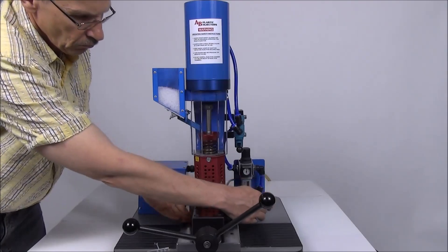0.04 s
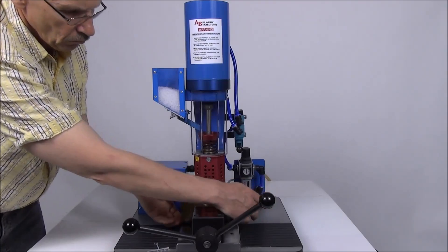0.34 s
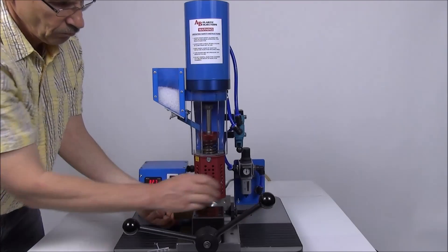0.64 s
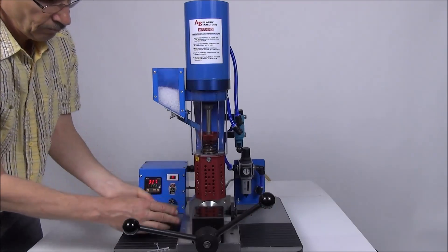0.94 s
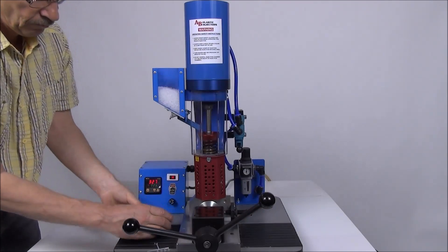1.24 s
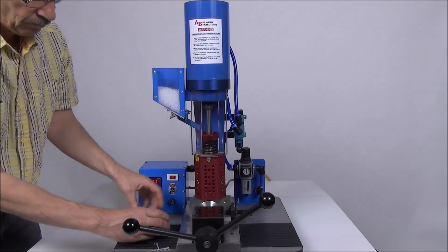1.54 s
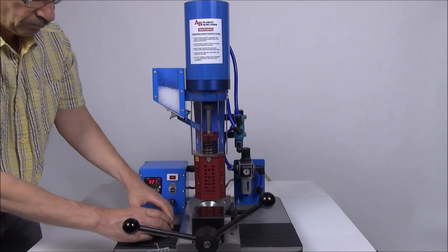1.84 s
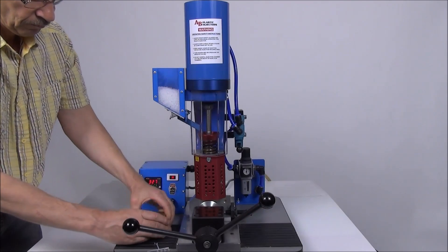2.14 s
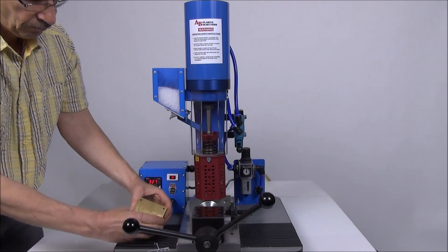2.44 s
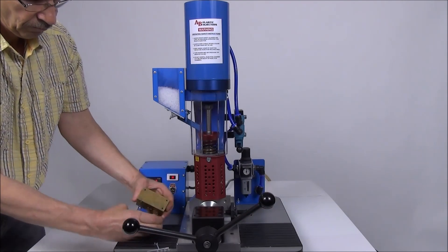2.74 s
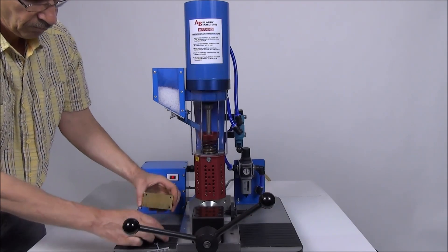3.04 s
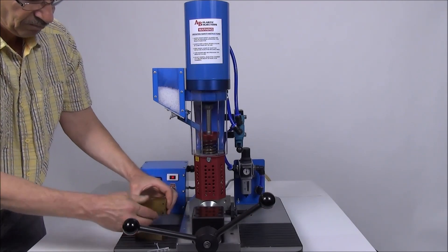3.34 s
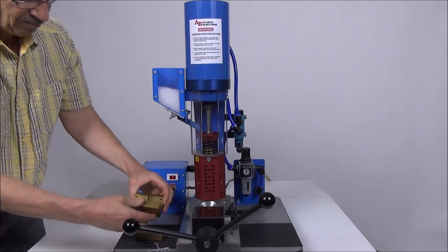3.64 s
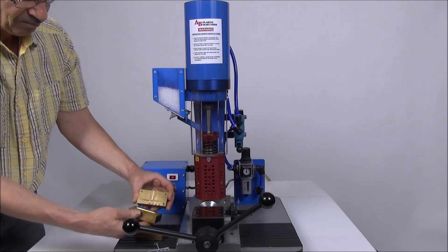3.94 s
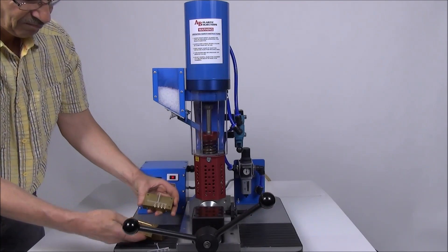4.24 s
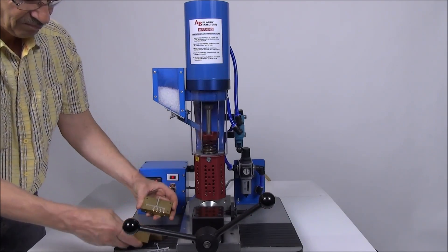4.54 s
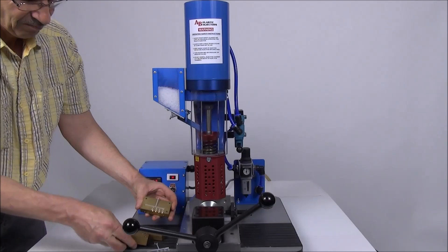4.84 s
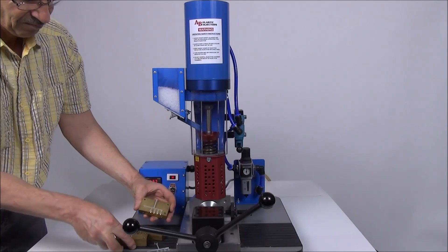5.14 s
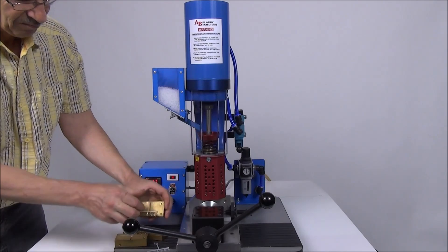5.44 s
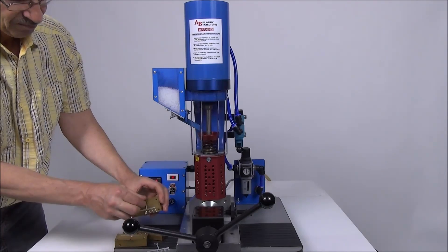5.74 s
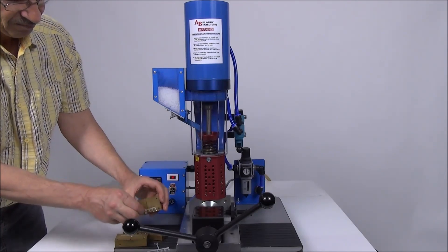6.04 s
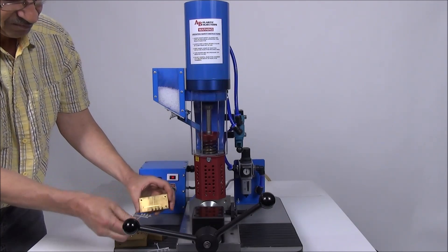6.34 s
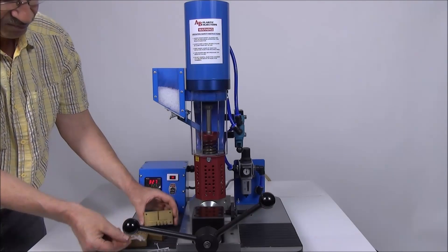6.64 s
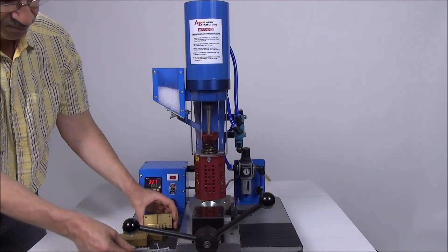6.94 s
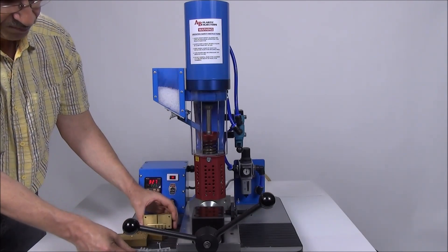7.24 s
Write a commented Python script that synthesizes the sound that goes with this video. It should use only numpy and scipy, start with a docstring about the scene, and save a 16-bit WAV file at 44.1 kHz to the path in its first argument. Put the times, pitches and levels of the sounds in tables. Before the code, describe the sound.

A brass mold clinks and knocks against a metal press base as its halves are parted and set down, over fan-like noise.

```python
"""Over a fan-like room noise and a thin whine, a brass mold scrapes softly and clinks. Its two halves are
pulled from a small bench press, parted and set down on the press's metal base. Light touches tick and
clink; heavy knocks thud through the bench and leave the press frame humming, and a loosely held half
sings when struck. The bright metal sounds echo briefly in a small workshop. An automatic gain control
turns everything down at a loud knock, then slowly back up."""
import sys
import numpy as np
from scipy import signal
from scipy.io import wavfile
from scipy.ndimage import uniform_filter1d

SR = 44100
rng = np.random.default_rng(int(sys.argv[2]) if len(sys.argv) > 2 else 0)


def store_pcm(level_fs):
    """Save levels as 16-bit WAV."""
    pcm = np.round(np.clip(level_fs, -1, 1) * 32767).astype(np.int16)
    wavfile.write(sys.argv[1], SR, np.atleast_2d(pcm).T)


N = 321749

# Levels in the tables are relative. A ring time (t60) is how long a sound takes to fall by 60 dB.
# The fan-like noise. Each row: frequency in Hz, level in dB.
FAN_SPECTRUM = [(22, -19.5), (65, -4), (95, -6.5), (150, -0.5), (250, -2), (420, -6), (750, -2),
                (1200, -7.5), (1850, -7.5), (3200, -17.5), (6500, -24.5), (11500, -22.5), (16000, -33)]
# Pitches that stand out of that noise. Each row: pitch in Hz, width in Hz, level in dB.
FAN_TONES = [(130, 14.4, -52), (697, 28, -65), (949, 13, -56.5), (1013.4, 19, -55), (1346, 35, -53.5),
             (1765, 14, -61.5)]
# How wide that noise sounds. Each row: frequency in Hz, side level compared with mid in dB.
FAN_WIDTH = [(30, -2), (130, -9), (500, -4.5), (1200, -8.5), (2400, 0), (8000, 0.5), (15000, -6)]
# A thin electronic whine. Each row: pitch in Hz, level in dB.
WHINE_TONES = [(12592, -79), (12807, -76), (12990, -68.5), (13178, -76), (13394, -69.5), (13722, -77)]
# The mold slides over the base. Each row: start in seconds, length in seconds, level in dB.
MOLD_SLIDES = [(0.0, 0.09, -51), (0.418, .12, -57), (0.812, 0.42, -49.5), (1.2, 0.23, -54)]
# Fingers shift the parts so they touch lightly. Each row: start in seconds, level in dB, pitch in Hz.
LIGHT_TOUCHES = [(0.026, -40, 4500), (0.066, -37, 4400), (0.626, -38, 4460), (1.658, -34, 5175),
                 (3.648, -26.5, 7300), (3.940, -29.5, 6540), (6.171, -38.5, 6000), (6.203, -39.5, 6000),
                 (7.018, -36, 5530)]
# A mold half meets the base or the other half: the bench thuds and clacks, the metal clinks.
# Each row: start in seconds, thud level in dB, thud's low edge in Hz, clack level in dB, clack pitch in Hz,
# clink level in dB, clink pitch in Hz, damping by the hand (width divided by pitch), edge ring level in dB.
MOLD_KNOCKS = [(0.050, -31, 302, -25.5, 1600, -25.5, 1730, 0.27, -47),
               (0.402, -40, 300, -27, 1920, -19, 4470, 0.14, -43),
               (0.712, -18, 320, -13.5, 1150, -9, 1450, 0.29, -36),
               (0.807, -16.5, 130, -8, 1480, 1, 4050, 0.099, 2),
               (0.871, -38, 190, -6, 1460, -14, 4270, 0.1, -24),
               (1.174, -20, 219, -27, 1150, -6, 3080, 0.12, -12),
               (1.416, 2, 360, -8, 720, -1.5, 3300, 0.36, -5.5),
               (1.428, -4, 128, -0.5, 900, 5.5, 3650, 0.54, 3),
               (1.441, -0.5, 90, -13, 1080, -9, 3900, 0.58, -8),
               (2.611, -40, 300, -29, 1600, -23, 2880, .48, -34),
               (2.979, 8, 290, 2, 1120, -4.5, 2260, 0.37, -14),
               (3.088, 5.5, 194, 11, 1200, 3.5, 2270, 0.3, -13),
               (3.124, 3.5, 197, 11.5, 1050, -3, 2200, 0.22, -21),
               (5.096, 7, 145, 9.5, 766, -5, 2290, 0.29, -25)]
# Short rings of the bench and base. Each row: pitch in Hz, level in dB, ring time in seconds.
BENCH_MODES = [(140.2, -19, 0.35), (167.3, -26, 0.12), (199, -34, 0.35), (238.2, -23.5, 0.36),
               (260.4, -27.5, 0.34), (311, -26, 0.16), (394, -22, 0.42), (427, -14, 0.29), (478, -24, 0.21),
               (501, -20.5, 0.1), (713, -23, 0.28), (767, -28, 0.32), (801, -24, 0.27), (840, -33, 0.26),
               (931, -26.5, 0.29), (993, -17.5, 0.18), (1022, -24.5, 0.23), (1153, -23, 0.16),
               (1158, -16, 0.14), (1375, -26.5, 0.33), (1538, -26, 0.28), (1695, -21.5, 0.26)]
# The bench's many other rings, which blur together. Each row: frequency in Hz, ring time in seconds.
BENCH_RING_TIMES = [(100, 0.51), (260, 0.54), (700, 0.34), (1100, 0.32), (1800, 0.31), (5000, 0.27)]
# How strong that blur is. Each row: frequency in Hz, level in dB.
BENCH_SPECTRUM = [(70, -6), (150, -2), (300, 0), (460, 2), (590, 0.5), (800, 2), (1100, -1), (1600, -0.5),
                  (2300, 2.5), (4000, 1.5)]
# Short, bright rings of the mold's edges. Each row: pitch in Hz, width in Hz, level in dB.
EDGE_MODES = [(7000, 430, 0), (9270, 460, -2)]
# For each edge ring, the dB it gains per dB of a knock's edge level: hard knocks favour the higher one.
EDGE_GAIN_SLOPES = (1, 1.15)
# The workshop's echo. Each row: frequency in Hz, ring time in seconds.
ROOM_RING_TIMES = [(200, 0.21), (1500, 0.35), (4500, 0.28), (10000, 0.26), (15000, 0.066)]
# The hum of the press frame. Each row: pitch in Hz, level in dB, ring time in seconds.
FRAME_MODES = [(195.7, -0.5, 2.38), (250, -12.5, 2.4), (348, -4.5, 1.76), (431, -2.5, 2), (440.5, 0, 1.2),
               (568, -8.5, 1.06), (682, -8.5, 1.47), (782, -10.5, 1.1), (1100, -14, 1.32)]
# Knocks that reach the frame. Each row: start in seconds, level in dB, treble tilt in dB per octave.
FRAME_KNOCKS = [(1.430, -27, -5), (3.090, -27, 3.5), (5.098, -24.5, -3.5)]
# A loosely held brass half is struck. Each row: start in seconds, level in dB.
BRASS_STRIKES = [(2.610, -37.5), (2.978, -43), (3.088, -24)]
# The notes it sings. Each row: pitch in Hz, level in dB, ring time in seconds.
BRASS_MODES = [(6640, 0, 0.12), (8600, -2.5, 0.17)]


def from_db(db):
    """Turn decibels into a number to multiply by."""
    return 10 ** (np.asarray(db) / 20)


def rms_one(x):
    """Scale a sound so its average strength (rms) is 1."""
    return x / np.sqrt(np.mean(x ** 2) + 1e-20)


def at_hz(points, hz):
    """Read between the rows of a (Hz, value) table, with octaves evenly spaced."""
    freqs, values = np.array(points).T
    return np.interp(np.log(hz), np.log(freqs), values)


def band(x, low_hz, high_hz, order=2):
    """Keep what lies between two frequencies."""
    edges = [low_hz, np.clip(high_hz, low_hz * 1.1, SR * .48)]
    return signal.sosfilt(signal.butter(order, edges, "band", fs=SR, output="sos"), x)


def around(x, hz, octaves):
    """Keep a band so many octaves wide around a pitch."""
    half = 2 ** (octaves / 2)
    return band(x, hz / half, hz * half)


def resonance(x, hz, width_hz):
    """Make a sound ring at one pitch; the narrower the width, the longer it rings."""
    r = np.exp(-np.pi * width_hz / SR)
    feedback = [1, -2 * r * np.cos(2 * np.pi * hz / SR), r * r]
    return signal.lfilter(np.array([1, 0, -1]) * (1 - r * r) / 2, feedback, x)


def fade(t60, size):
    """A curve that starts at 1 and falls 60 dB every t60 seconds."""
    return np.exp(-np.log(1000) * np.arange(size) / (SR * t60))


def stereo(mid, side):
    """Make left and right from what they share (mid) and what sets them apart (side)."""
    return np.array([mid + side, mid - side])


def add(track, start_s, sound):
    """Mix a sound into a track at a given time."""
    start = int(start_s * SR)
    track[start:start + len(sound)] += sound[:N - start]


def through(x, response):
    """Play a mono track through an object or room, given its stereo response to one click."""
    return signal.fftconvolve(x[None], response, axes=1)[:, :N]


def noise_bands(size):
    """Yield (centre in Hz, mid noise, side noise) for bands about a third of an octave wide."""
    edges = np.geomspace(20, 18000, 30)
    white = rng.standard_normal((2, 2, size + SR // 10))   # extra length lets the filters settle
    for k, (low, high) in enumerate(zip(edges, edges[1:])):
        mid, side = band(white[k % 2], low, high)[:, -size:]   # neighbours use unrelated noise
        yield np.sqrt(low * high), mid, side


def dense_ring(t60s, side_db, size, spectrum=((1000, 0),)):
    """Countless overlapping rings: stereo noise that dies away band by band."""
    return sum(from_db(at_hz(spectrum, hz)) * stereo(mid, from_db(side_db) * side)
               * fade(at_hz(t60s, hz), size) for hz, mid, side in noise_bands(size))


def clear_ring(modes, size):
    """An object's own notes (modes) as fading sine waves, every second one flipped."""
    t = np.arange(size) / SR
    return sum((-1) ** k * from_db(db) * fade(t60, size) * np.sin(2 * np.pi * hz * t)
               for k, (hz, db, t60) in enumerate(modes))


def chatter(t60):
    """Hard faces meet in a quick burst of tiny contacts."""
    return rng.standard_normal(SR // 10) * fade(t60, SR // 10)


def fan_noise(air_db, tone_side_db):
    """A steady, fan-like rush of air with a few faint pitches in it."""
    air = sum(from_db(at_hz(FAN_SPECTRUM, hz)) * stereo(mid, from_db(at_hz(FAN_WIDTH, hz)) * side)
              for hz, mid, side in noise_bands(N))
    out = from_db(air_db) * rms_one(air)
    for hz, width_hz, db in FAN_TONES:
        mid, side = rms_one(resonance(rng.standard_normal((2, N)), hz, width_hz))
        out += from_db(db) * stereo(mid, from_db(tone_side_db) * side)
    return out


def whine(boost_db, tone_width_hz, hiss_db, hiss_hz, hiss_width_hz):
    """An electronic whine: a cluster of very high tones on a narrow hiss."""
    tones = sum(from_db(db) * rms_one(resonance(rng.standard_normal(N), hz, tone_width_hz))
                for hz, db in WHINE_TONES)
    pair = from_db(boost_db) * signal.hilbert(tones)   # left and right, a quarter cycle apart
    hiss = rms_one(resonance(rng.standard_normal((2, N)), hiss_hz, hiss_width_hz))
    return np.array([pair.real, pair.imag]) + from_db(hiss_db) * hiss


def slides(grain_db, low_hz, high_hz):
    """The mold rubs on the base: a grainy scrape that swells and fades with each push."""
    swell = np.zeros(N)
    grains = rng.standard_normal(N) * from_db(grain_db * rng.standard_normal(N))
    for start_s, length_s, db in MOLD_SLIDES:
        add(swell, start_s, from_db(db) * np.hanning(int(length_s * SR)))
    return swell * rms_one(band(grains, low_hz, high_hz, order=1))


def finger_ticks(tick_t60, octaves, slip_gap_s, slip_step_db):
    """The parts touch lightly in the hand, then slip twice at uneven gaps, weaker each time."""
    out = np.zeros(N)
    for start_s, db, hz in LIGHT_TOUCHES:
        for k in range(3):
            tick = around(chatter(tick_t60), hz, octaves)
            delay_s = k * slip_gap_s * rng.uniform(.7, 1.3)
            add(out, start_s + delay_s, from_db(db + k * slip_step_db) * tick)
    return out


def bench_knocks(thud_top_hz, dense_db, side_db, first_wave_db, first_wave_t60):
    """Each knock is a slow push (thud) plus a quick one (clack); both make the same bench ring."""
    force, click = np.zeros(N), signal.unit_impulse(SR // 10)
    for start_s, thud_db, thud_low_hz, clack_db, clack_hz, _, _, damping, _ in MOLD_KNOCKS:
        add(force, start_s, from_db(thud_db) * band(click, thud_low_hz, thud_top_hz, order=3))
        octaves = 0.29 + 1.86 * damping   # a loose contact clacks at one pitch, a damped one broadly
        add(force, start_s, from_db(clack_db) * around(click, clack_hz, octaves))
    dense = dense_ring(BENCH_RING_TIMES, side_db, size=SR, spectrum=BENCH_SPECTRUM)
    # the first wave from the point of impact is stronger than the ringing that follows
    dense *= 1 + from_db(first_wave_db) * fade(first_wave_t60, size=SR)
    return through(force, clear_ring(BENCH_MODES, size=SR) + from_db(dense_db) * dense)


def clinks(contact_t60, chatter_db, width_ratio, low_hz, top_hz):
    """Metal held in the hand: the grip sets its pitch and damping, but the edges keep their pitches."""
    out = np.zeros(N)
    for start_s, *_, clink_db, clink_hz, damping, edge_db in MOLD_KNOCKS:
        body = (clink_hz, damping * clink_hz, clink_db)
        edges = [(hz, width_hz, db + slope * edge_db)
                 for (hz, width_hz, db), slope in zip(EDGE_MODES, EDGE_GAIN_SLOPES)]
        for hz, width_hz, db in [body] + edges:
            contact = signal.unit_impulse(SR // 10) + from_db(chatter_db) * chatter(contact_t60)
            ring = resonance(contact, hz, width_hz)
            ring = resonance(ring, hz, width_hz * width_ratio)   # trims sound far from the pitch
            add(out, start_s, 2 * from_db(db) * ring / np.sqrt(np.sum(ring ** 2)))
    return band(out, low_hz, top_hz, order=4)


def snaps(offset_db, snap_t60, low_hz, high_hz, top_hz):
    """The dry snap as hard faces meet at the start of a knock; it grows with the clink."""
    bursts = np.zeros(N)
    for start_s, *_, clink_db, _, _, _ in MOLD_KNOCKS:
        add(bursts, start_s, from_db(clink_db + offset_db) * chatter(snap_t60))
    bright = band(bursts, low_hz, high_hz, order=1)
    return band(bright, 256, top_hz, order=4)


def frame_hum(left_minus_right_db):
    """The press frame hums on after heavy knocks; two close pitches make it waver."""
    out = np.zeros(N)
    lowest_hz = FRAME_MODES[0][0]
    for start_s, db, tilt_db in FRAME_KNOCKS:
        modes = [(hz, db + mode_db + tilt_db * np.log2(hz / lowest_hz), t60)
                 for hz, mode_db, t60 in FRAME_MODES]
        add(out, start_s, clear_ring(modes, size=3 * SR))
    return out * from_db([[left_minus_right_db / 2], [-left_minus_right_db / 2]])


def brass_ring():
    """A loosely held half is free to ring, and sings two clean, high notes."""
    out = np.zeros(N)
    for start_s, db in BRASS_STRIKES:
        add(out, start_s, from_db(db) * clear_ring(BRASS_MODES, size=SR))
    return out


def room(x, echo_db, side_db, gap_s):
    """The direct sound, then the short echo of a small workshop."""
    tail = dense_ring(ROOM_RING_TIMES, side_db, size=SR // 2) * (np.arange(SR // 2) > gap_s * SR)
    tail /= np.sqrt(np.sum(tail ** 2) / 2)
    return x + from_db(echo_db) * through(x, tail)


def scene():
    """Mix the bright metal sounds and their echo with the bench, the press and the background."""
    metal = clinks(contact_t60=0.022, chatter_db=-18, width_ratio=1.7, low_hz=810, top_hz=10000)
    metal += brass_ring()
    metal += snaps(offset_db=-7, snap_t60=0.015, low_hz=1200, high_hz=5050, top_hz=10000)
    metal += finger_ticks(tick_t60=0.018, octaves=1.3, slip_gap_s=0.011, slip_step_db=-6)
    metal += slides(grain_db=4, low_hz=1402, high_hz=6400)
    press = bench_knocks(thud_top_hz=555, dense_db=-2.5, side_db=-10,
                         first_wave_db=-4, first_wave_t60=0.034)
    press += frame_hum(left_minus_right_db=-2.3)
    background = fan_noise(air_db=-41.5, tone_side_db=-8)
    background += whine(boost_db=11.5, tone_width_hz=25, hiss_db=-53.5, hiss_hz=13200, hiss_width_hz=960)
    return press + room(metal, echo_db=-4, side_db=0, gap_s=0.0029) + background


def gain_control(x, threshold_db, recovery_db_per_s, treble_weight):
    """The volume drops at once on a loud sound, more so on a bright one, and creeps back."""
    power = x ** 2 + (treble_weight * np.diff(x, prepend=0)) ** 2
    level_db = 10 * np.log10(uniform_filter1d(power.mean(axis=0), size=300) + 1e-12)
    excess_db = np.maximum(level_db - threshold_db, 0)
    ramp = recovery_db_per_s * np.arange(N) / SR
    cut_db = np.maximum.accumulate(excess_db + ramp) - ramp   # each cut shrinks at a steady rate
    return x * from_db(-cut_db)


def record(dry, cutoff_hz=15900):
    """Turn down loud knocks, round off the peaks and remove the highest treble."""
    held = gain_control(dry, threshold_db=-8, recovery_db_per_s=2, treble_weight=1.43)
    rounded = held / (1 + held ** 8) ** (1 / 8)
    low_pass = signal.ellip(10, .1, 80, cutoff_hz, fs=SR, output="sos")
    return signal.sosfilt(low_pass, .92 * rounded)


dry = scene()
out = record(dry)
store_pcm(out)
```